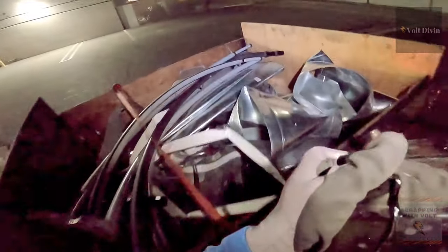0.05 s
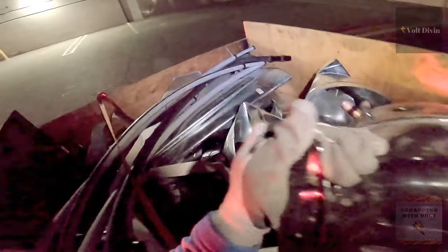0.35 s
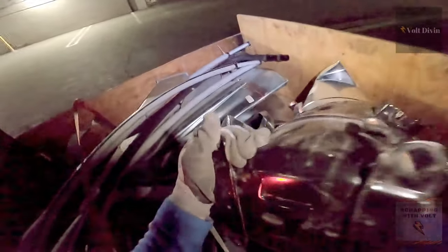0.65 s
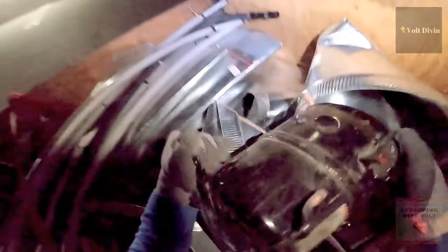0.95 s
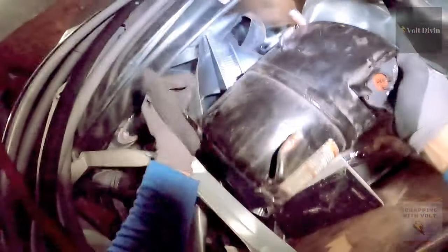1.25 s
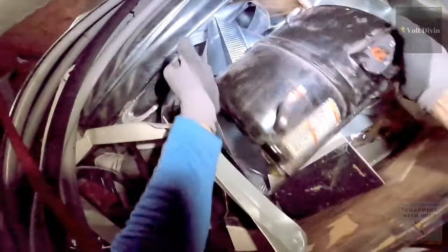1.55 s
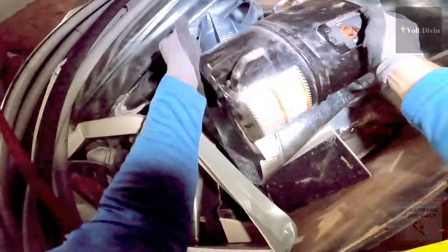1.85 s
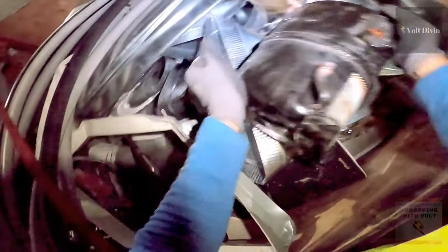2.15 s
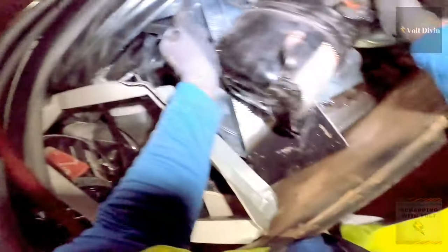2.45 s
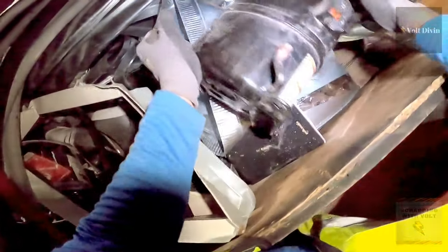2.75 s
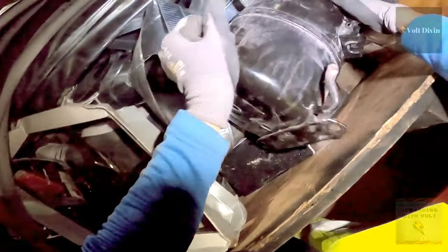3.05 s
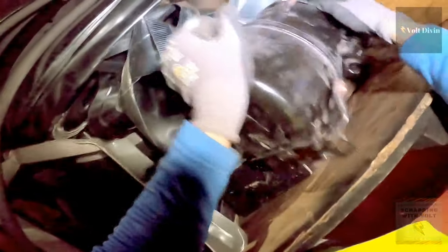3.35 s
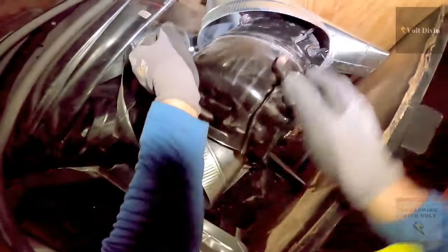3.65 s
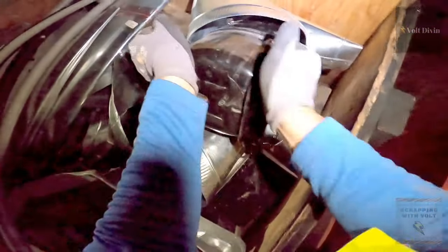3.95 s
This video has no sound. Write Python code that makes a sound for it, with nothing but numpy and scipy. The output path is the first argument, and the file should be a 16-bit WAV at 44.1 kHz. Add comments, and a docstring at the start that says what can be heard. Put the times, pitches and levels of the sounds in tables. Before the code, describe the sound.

Close-up scrap metal clatter in a dumpster. After a quiet moment of faint engine idle and light handling, a steel tank is shoved again and again across the pile, banging, rattling and ringing, and finally squealing briefly.

```python
"""Gloved hands heave a steel tank about on the scrap in a dumpster.
At first there are only light touches, over a nearby idling engine and the noise of the yard.
From 0.9 s, shove after shove sets off a chatter of metal contacts, and the background drops.
Each contact excites free vibration: the pile clatters, thin sheets and the tank ring, the bin booms on.
Single pieces clang out of the clatter, and metal squeals on metal near the end."""
import sys
import numpy as np
from scipy import signal
from scipy.fft import rfft, irfft
from scipy.io import wavfile

SR = 44100
rng = np.random.default_rng(int(sys.argv[2]) if len(sys.argv) > 2 else 0)


def store_pcm(level_fs):
    """Save levels as 16-bit WAV."""
    pcm = np.round(np.clip(level_fs, -1, 1) * 32767).astype(np.int16)
    wavfile.write(sys.argv[1], SR, np.atleast_2d(pcm).T)


N = 176400
RING_SAMPLES, CUTOFF_HZ = 48000, 15700

# Half-octave bands, shared by the clatter and the yard noise
EDGES_HZ = 7700 * 2 ** (np.arange(-15, 3) / 2)
CENTRES_HZ = np.sqrt(EDGES_HZ[1:] * EDGES_HZ[:-1])
BANK = [signal.butter(2 if low < 2500 else 5, (low, high), "band", fs=SR, output="sos")
        for low, high in zip(EDGES_HZ, EDGES_HZ[1:])]


def from_db(db):
    """Amplitude ratio of a level in decibels."""
    return 10 ** (np.asarray(db) / 20)


def unit_energy(x):
    """Normalise each row to an energy of one."""
    return x / np.sqrt(np.sum(x ** 2, axis=-1, keepdims=True) + 1e-20)


def rms_one(x):
    """Normalise each row to an rms of one."""
    return unit_energy(x) * np.sqrt(x.shape[-1])


def at_hz(points, hz, column=1):
    """Interpolate a column of a table over log frequency."""
    points = np.array(points)
    return np.interp(np.log(hz), np.log(points[:, 0]), points[:, column])


def band_gains(spectrum):
    """Band power is spectral density times bandwidth; the gains give a total power of one."""
    return unit_energy(from_db(at_hz(spectrum, CENTRES_HZ)) * np.sqrt(CENTRES_HZ))


def fade(t, t60):
    """Exponential decay, 60 dB down after t60."""
    return np.exp(-np.log(1000) * t / t60)


def swell(t, rise, t60):
    """A linear rise, then exponential decay."""
    return np.minimum(t / max(rise, 1e-4), 1) * fade(np.maximum(t - rise, 0), t60)


def drift(rate_hz):
    """Random modulation of rms one, interpolated between rate_hz values a second."""
    knots = rng.standard_normal(4096)
    return rms_one(np.interp(np.arange(N) / SR * rate_hz, np.arange(len(knots)), knots))


def add(out, start_s, sound):
    """Superpose a sound from start_s on."""
    i = max(int(start_s * SR), 0)
    out[i:i + len(sound)] += sound[:N - i]


def shoved_scrap():
    """Convolution: each shove's contacts drive the pile, whose dense modes act as decaying noise."""
    # start_s, rise_s, chatter_t60_s, hit_ratio, boom_db, body_db, clang_db, clash_db, sizzle_db
    shoves = [(0.906, 0.011, 0.63, 2.2, 9.5, 8, 10.5, 8, -2), (1.019, 0.016, 0.27, 2.4, 8, 0, 7, 3, -3),
              (1.077, 0.0063, 0.54, 1.4, -22, 3, 8, 1.5, -0.5),
              (1.157, 0.006, 0.063, 3.6, 6, 1.5, 4.5, 3.5, -1.5),
              (1.289, 0.0032, 0.51, 1.4, -10.5, -4, -5, -27, -33),
              (1.371, 0.024, 0.12, 1, -16, -21, -9.5, -20, -34),
              (1.711, 0.019, 0.28, 0.65, -4.5, 0, 3, 2, -6),
              (1.772, 0.012, 0.48, 0.46, -1.5, -1.5, -11, -17, -15),
              (1.95, 0.0043, 1.4, 0.87, -1.5, -9.5, -11, -10.5, -18.5),
              (2.056, 0.0074, 1.74, 0.41, -5.5, 4, 0.5, -3.5, -8.5),
              (2.105, 0.024, 0.19, 2, -9.5, -4, 0, 1.5, -9),
              (2.194, 0.0047, 0.039, 4, -2.5, -4, -4.5, -6.5, -30),
              (2.271, 0.022, 0.12, 0.44, -3, -7, -9.5, -7.5, -0.5),
              (2.328, 0.03, 0.22, 1.4, 2.5, -7, -7, -15, -19),
              (2.493, 0.0059, 0.06, 2.4, -31, -10.5, -11, -8.5, -21),
              (2.53, 0.16, 0.66, 0.24, -2, -5, -9, -19.5, -27),
              (2.74, 0.005, 0.099, 3.9, -8, -2.5, 1, 2, -27),
              (2.766, 0.0074, 0.056, 0.68, -17, 0, -4, 4, -14),
              (2.862, 0.0044, 0.86, 5, -2, -7, -2, -5, -14),
              (2.947, 0.007, 1.75, 3.3, 5.5, 2, 2.5, -7, -18),
              (3.092, 0.027, 0.4, 1.1, 4.5, -1.5, 9, 1.5, -1.5),
              (3.17, 0.0086, 0.34, 3.8, -6, 2.5, 2.5, -3, -9),
              (3.261, 0.011, 0.24, 0.78, -1.5, -4.5, -2.5, -4.5, -11.5),
              (3.408, 0.0078, 0.99, 0.5, -14, -45, -6.5, -10, -15),
              (3.502, 0.0069, 0.052, 1.5, -3, -2, -4, 2, -10),
              (3.562, 0.0065, 0.85, 0.82, -3, -2.5, -1, -4, -9),
              (3.656, 0.014, 0.1, 1.14, -12, 2, 2, 3, -3), (3.723, 0.0077, 11, 1.9, 2.5, 3, -3, -6.5, -13),
              (3.809, 0.005, 0.07, 2.2, -38, 1, -4.5, 3.5, -5),
              (3.894, 0.0049, 0.048, 1.4, -7, 3, 3.5, -12, -14),
              (3.912, 0.0044, 0.32, 1.9, -3, -13, 2, -2.5, -8)]
    # Registers from boom to sizzle: frequency_hz
    registers_hz = [100, 400, 1400, 4300, 10000]
    # Spectrum of the pile: frequency_hz, density_db
    pile_spectrum = [(52, -8.5), (80, 2), (125, -0.5), (350, 0), (650, -6), (1200, -20.5), (1900, -18.5),
                     (3300, -21), (4600, -27), (6500, -29.5), (9200, -46), (13000, -54)]
    # Damping of the struck pieces and the bin: frequency_hz, pieces_t60_s, bin_t60_s
    damping = [(100, 0.32, 1.27), (400, 0.39, 1.3), (1380, 0.34, 0.88), (4250, 0.22, 0.63),
               (10000, 0.26, 0.12)]
    out, t = np.zeros(N), np.arange(RING_SAMPLES) / SR
    pieces = fade(t, at_hz(damping, CENTRES_HZ, column=1)[:, None])
    bin_tail = from_db(-13) * fade(t, at_hz(damping, CENTRES_HZ, column=2)[:, None])
    crack = from_db(7.5) * fade(t, t60=0.02)
    decay = np.sqrt(pieces ** 2 + bin_tail ** 2 + crack ** 2)  # incoherent parts add in power
    fft_size, impulse = 2 * RING_SAMPLES, (t == 0) + 1e-18
    bands = rfft([signal.sosfilt(band, impulse) for band in BANK], fft_size)
    dense_modes = rng.standard_normal((len(BANK), N))
    for start_s, rise_s, t60_s, hit_ratio, *levels_db in shoves:
        clicks = contact_chatter(start_s, rise_s, t60_s, hit_ratio)
        colour = list(zip(registers_hz, levels_db))
        offset = rng.integers(0, N - RING_SAMPLES)  # every shove rattles other pieces
        response = bands * rfft(dense_modes[:, offset:offset + RING_SAMPLES] * decay, fft_size)
        clatter = irfft(response * rfft(clicks, fft_size))[:, :RING_SAMPLES]
        gains = band_gains(pile_spectrum) * from_db(at_hz(colour, CENTRES_HZ))
        add(out, start_s, gains @ unit_energy(clatter) + sheets_and_tank(clicks, colour))
    return from_db(-26.5) * np.sqrt(0.1 * SR) * out  # unit energy scaled to an rms over 0.1 s


def contact_chatter(start_s, rise_s, t60_s, hit_ratio, contacts_per_s=470, spread_db=3.5):
    """Impulsive excitation: a Poisson train of contacts swells and dies, with a firm hit at its crest."""
    t = np.arange(RING_SAMPLES) / SR
    sizes = from_db(spread_db * np.clip(rng.standard_normal(len(t)), -2, 2))
    signs = rng.choice([-1, 1], len(t))
    in_contact = rng.random(len(t)) < contacts_per_s / SR
    clicks = rms_one(sizes * signs) * in_contact * swell(t, rise_s, t60_s)
    clicks[int(rise_s * SR)] += hit_ratio  # relative to an rms contact
    return clicks * (start_s + t < N / SR)


def sheets_and_tank(clicks, colour, spread_db=1, detune=0.0041, top_hz=6400):
    """Modal vibration: level and pitch vary a little with where the metal is struck and pressed."""
    # Modes of the thin sheets: pitch_hz, level_db, t60_s
    sheet_modes = [(1227, -41, 0.093), (1669, -25.5, 0.3), (1906, -27.5, 0.38), (2180, -38.5, 0.26),
                   (2645, -31.5, 0.33), (2830, -27.5, 0.12), (2974, -45.5, 0.22)]
    # Modes of the tank: pitch_hz, level_db, t60_s
    tank_modes = [(81.8, -13, 0.45), (269.6, -23.5, 0.15), (345, -31.5, 0.25), (435.3, -25, 1),
                  (487, -16, 0.95), (581, -38, 0.17)]
    ringing = np.zeros(len(clicks))
    for pitch_hz, level_db, t60_s in sheet_modes + tank_modes:
        weakening, strain = rng.standard_normal(2)
        gain = from_db(level_db + at_hz(colour, pitch_hz) - spread_db * weakening)
        ringing += gain * unit_energy(damped_mode(clicks, pitch_hz * (1 + detune * strain), t60_s))
    soft_contact = signal.butter(6, top_hz, fs=SR, output="sos")
    return signal.sosfilt(soft_contact, ringing)


def damped_mode(clicks, pitch_hz, t60_s):
    """A damped harmonic oscillator driven by impulses."""
    radius, angle = fade(1 / SR, t60_s), 2 * np.pi * pitch_hz / SR
    feedback = [1, -2 * radius * np.cos(angle), radius ** 2]
    return signal.lfilter([0, np.sin(angle)], feedback, clicks + 1e-18)


def ringing_pieces(jostles_per_s=90, waver_hz=14, waver_db=1.5):
    """Free vibration of a piece caught squarely; jostling modulates its frequency and amplitude."""
    # Hollow knocks and clangs: start_s, t60_s, pitch_hz, level_db
    clangs = [(0.925, 0.17, 4635, -35), (1.722, 0.65, 701, -32.5), (2.187, 0.071, 383, -22.5),
              (3.1, 0.83, 345, -22.5), (3.2, 0.34, 660, -30), (3.293, 0.46, 1460, -42.5),
              (3.503, 0.32, 649.4, -32.5), (3.683, 0.62, 463.5, -31), (3.889, 0.13, 375, -23)]
    out, t = np.zeros(N), np.arange(RING_SAMPLES) / SR
    for start_s, t60_s, pitch_hz, level_db in clangs:
        wavering_hz = pitch_hz + waver_hz * drift(jostles_per_s)[:len(t)]
        gain = from_db(level_db + waver_db * drift(jostles_per_s)[:len(t)])
        tone = np.sqrt(2) * np.sin(2 * np.pi * np.cumsum(wavering_hz) / SR)
        add(out, start_s, gain * tone * swell(t, rise=0.016, t60=t60_s))
    return out


def noise_bursts(grain_db=1.5):
    """Resonant filtering: each short burst is grainy noise passed through one resonance."""
    # Light touches, scrapes, a bright clang, a faint rattle and metal squeals:
    # start_s, t60_s, centre_hz, width_hz, level_db
    bursts = [(0.073, 0.099, 8000, 5000, -62.5), (.2, 0.46, 2140, 590, -56.5),
              (0.21, 0.38, 4970, 1800, -64.5), (0.28, 0.084, 4350, 3450, -58.5),
              (.436, 0.078, 625, 200, -39), (0.528, 0.063, 2750, 2490, -56),
              (0.549, 0.068, 2800, 2500, -60.5), (.637, 0.16, 4050, 4000, -64),
              (0.689, 0.13, 2550, 2500, -56.5), (0.899, 0.55, 2950, 3020, -42.5),
              (.927, 0.33, 5100, 2200, -34), (1.596, 1, 3270, 2500, -63.5), (2.743, 0.22, 8700, 2200, -57),
              (3.668, 0.52, 1640, 300, -30.5), (3.812, 0.18, 6010, 610, -30.5)]
    out, t = np.zeros(N), np.arange(SR // 2) / SR
    for start_s, t60_s, centre_hz, width_hz, level_db in bursts:
        grainy_noise = rng.standard_normal(len(t)) * from_db(grain_db * drift(rate_hz=300)[:len(t)])
        edges_hz = np.clip([centre_hz - width_hz / 2, centre_hz + width_hz / 2], 100, CUTOFF_HZ)
        resonance = signal.butter(2, edges_hz, "band", fs=SR, output="sos")
        burst = rms_one(signal.sosfilt(resonance, grainy_noise))
        add(out, start_s, from_db(level_db) * burst * swell(t, rise=0.0016, t60=t60_s))
    return out


def idling_engine(firing_hz=29.63, waver=0.017):
    """Nearly periodic firing gives a harmonic series on a wavering fundamental."""
    # Harmonics of the firing rate, from the first up: level_db
    harmonics_db = [-38.5, -62.5, -58.5, -57]
    phase = 2 * np.pi * np.cumsum(firing_hz * (1 + waver * drift(rate_hz=8.56))) / SR
    return sum(np.sqrt(2) * from_db(level_db) * np.sin(order * phase + rng.uniform(0, 2 * np.pi))
               for order, level_db in enumerate(harmonics_db, start=1))


def yard_noise():
    """Spectral shaping: bands of white noise are weighted into a steady, low rumble."""
    # Spectrum of the yard: frequency_hz, density_db
    yard_spectrum = [(24, -29), (40, -1), (86, -37.5), (149, -28), (621, -32.5), (1560, -42.5),
                     (3000, -59.5), (7580, -68.5), (9850, -90)]
    white = rng.standard_normal((2, N))  # neighbouring bands are uncorrelated
    bands = np.array([signal.sosfilt(band, white[k % 2]) for k, band in enumerate(BANK)])
    return from_db(-46.5) * band_gains(yard_spectrum) @ rms_one(bands)


def background():
    """One amplitude envelope on engine and yard: it drops at the first crash and slowly recovers."""
    # Level of the background: time_s, gain_db
    envelope = [(0, 1.5), (.9, 2), (1.0, -9), (1.65, -6.5), (4, -1)]
    gain = from_db(np.interp(np.arange(N) / SR, *np.transpose(envelope)))
    return (idling_engine() + yard_noise()) * gain


def scene():
    """Superposition of all the sources at one point."""
    return (shoved_scrap() + ringing_pieces() + noise_bursts() + background())[None]


def record(dry):
    """Band limiting: a steep low-pass removes the highest treble."""
    return signal.sosfilt(signal.cheby2(12, 70, CUTOFF_HZ + 800, fs=SR, output="sos"), dry)


dry = scene()
out = record(dry)
store_pcm(out)
```